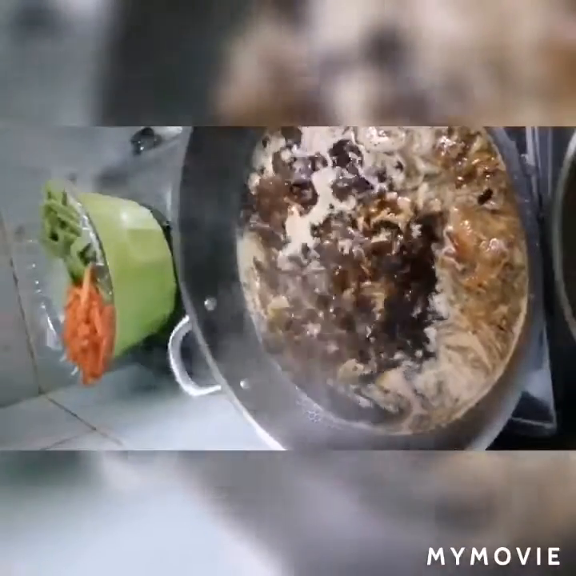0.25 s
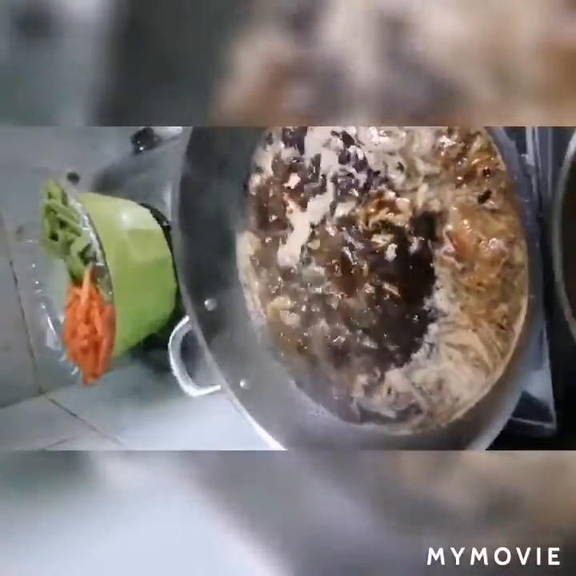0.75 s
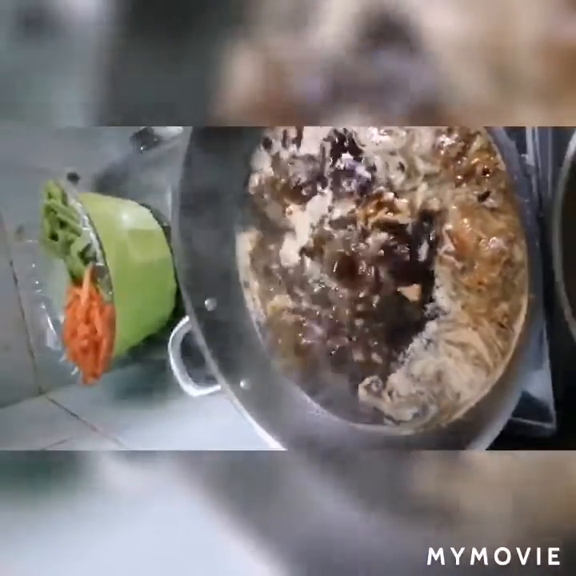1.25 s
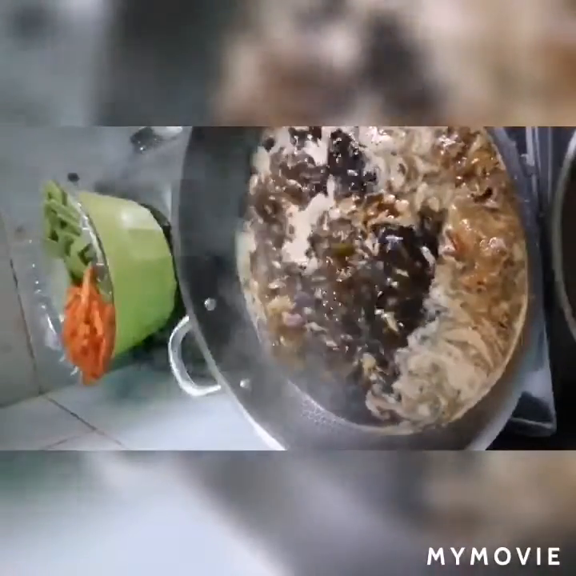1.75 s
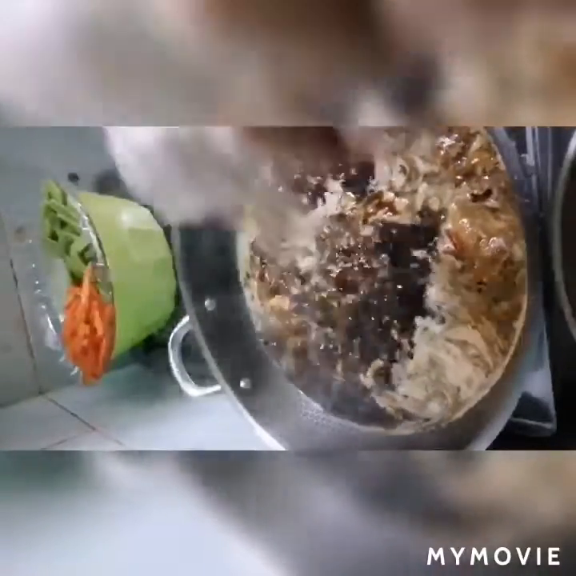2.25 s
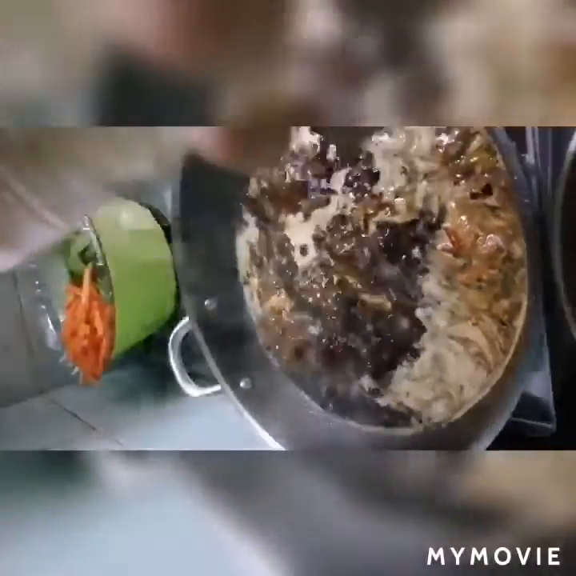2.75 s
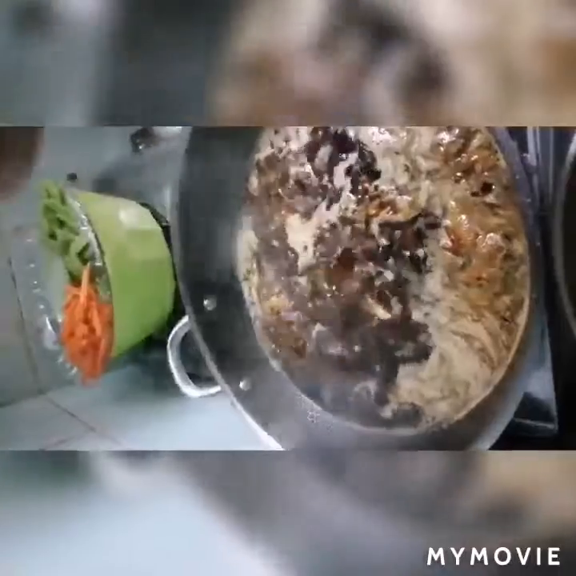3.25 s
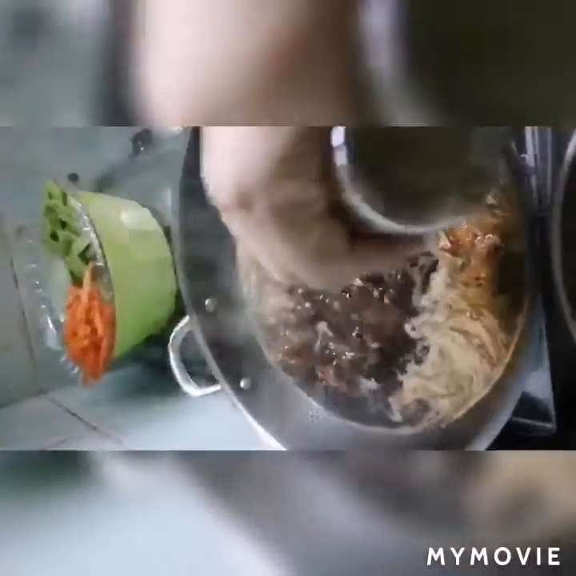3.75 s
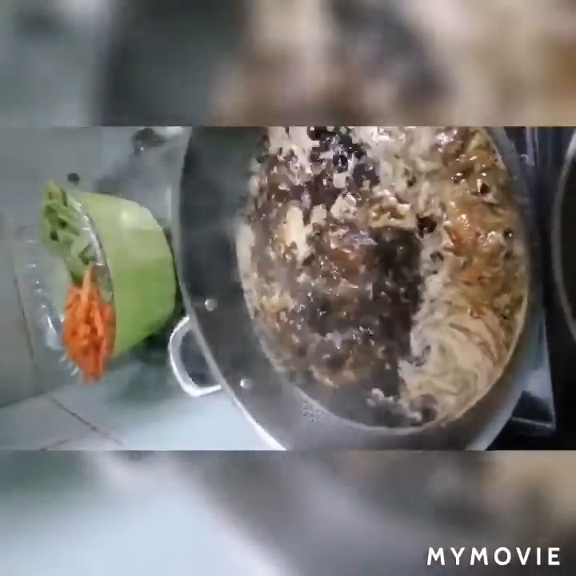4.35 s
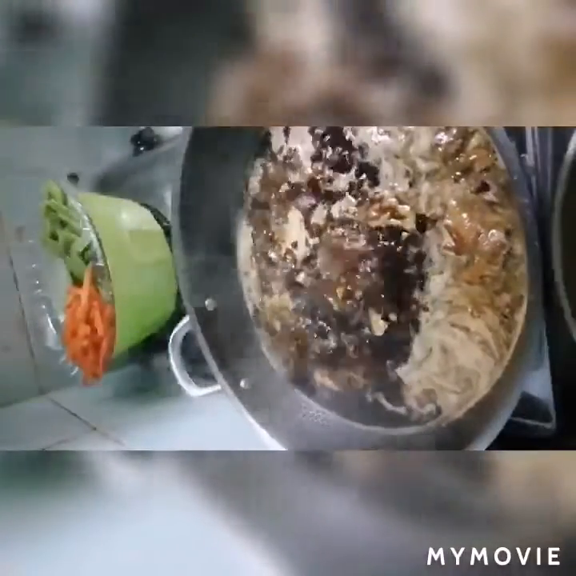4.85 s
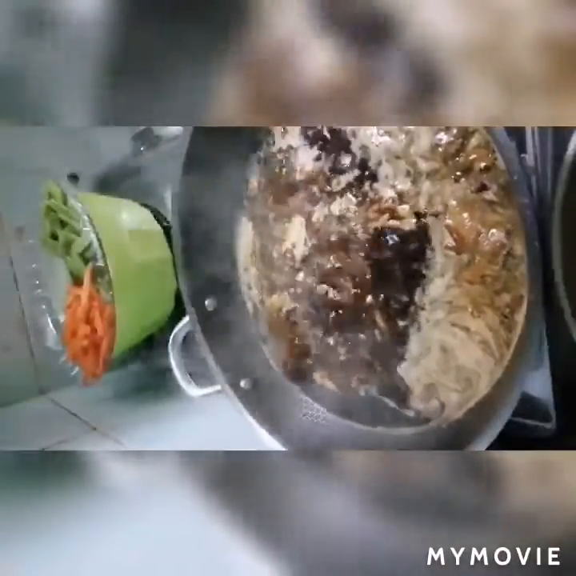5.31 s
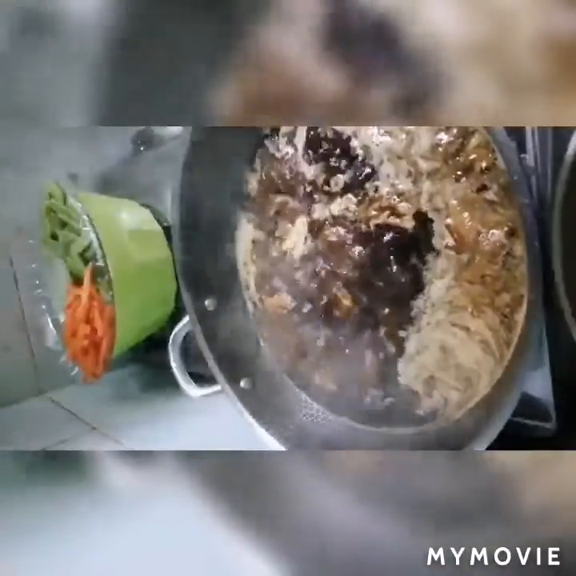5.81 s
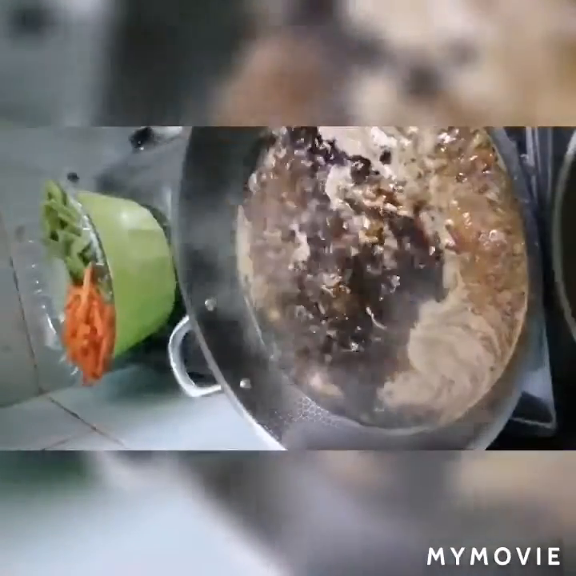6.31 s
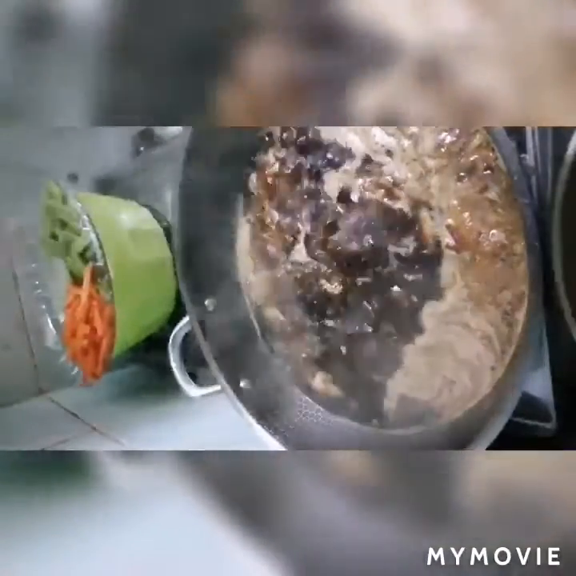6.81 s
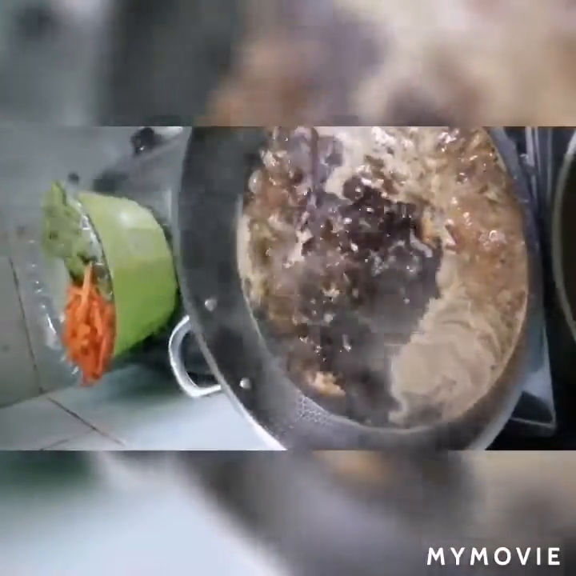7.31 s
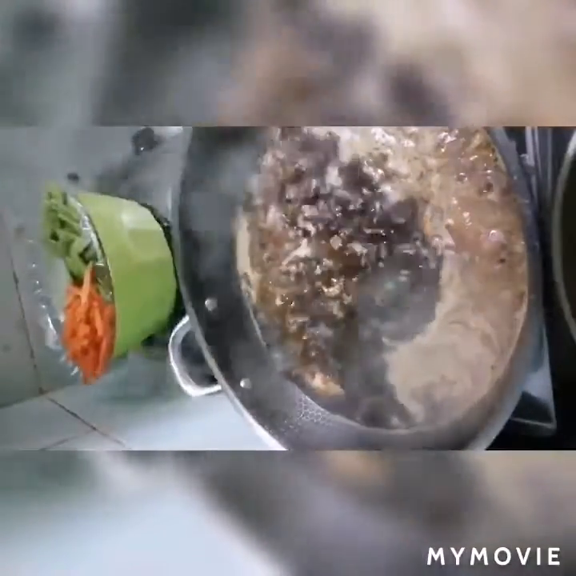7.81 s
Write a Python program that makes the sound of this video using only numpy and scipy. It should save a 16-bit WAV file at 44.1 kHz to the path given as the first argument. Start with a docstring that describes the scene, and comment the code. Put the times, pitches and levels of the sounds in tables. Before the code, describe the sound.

Noodles simmer softly with blips and faint hiss while a crinkly packet rattles sharply, goes quiet, clinks past, then is shaken again.

```python
"""Noodles simmer in a wok in a small kitchen: faint sizzle, soft bubbles, wavering hum and rumble throughout.
0-0.6 s: a crisp packet is shaken and crinkled close by (bursts of filtered clicks), some shakes with a low, dull part.
0.9-5.1 s: small rustles; thin whistles of narrow-band noise; from 4.6 s a clink of ringing modes, then fainter ones.
5.7-7.2 s: a second bout of shaking. Packet treble peaks near 6 and 10 kHz; gain control ducks all under loud shakes."""
import sys
import numpy as np
from scipy import signal
from scipy.fft import rfft, irfft, next_fast_len
from scipy.io import wavfile
from scipy.ndimage import uniform_filter1d

SR = 44100
rng = np.random.default_rng(int(sys.argv[2]) if len(sys.argv) > 2 else 0)


def dump_mix(stems):
    """Bounce the given channels to the path in sys.argv[1] as a 16-bit WAV at rate SR."""
    frames = np.atleast_2d(stems).T  # one column per channel
    limited = np.clip(frames, -1, 1)  # hard clip at full scale
    pcm = np.round(limited * 32767).astype(np.int16)
    wavfile.write(sys.argv[1], SR, pcm)


N = 355931

# Levels are before ducking.
# Crackle bursts: packet shakes and rustles; the rows at 4.807 and 5.024 are the noisy touch of the fainter clinks.
# Each row: start in seconds, level in dB before the overall trim, hollow air body in dB re film,
# crisp top in dB re film, shower T60 in seconds, snap in dB re shower.
CRACKLE_BURSTS = [(0.0024, -42, -7.5, -11, 0.19, 9), (0.026, -49, -22, -14, 0.13, 10),
                  (0.0726, -29.5, -19, -5, 0.29, -2), (0.0852, -30.5, -19, -8, 0.3, -5),
                  (0.1204, -32, -5, -8, 0.22, -5), (0.136, -24, -23, 0, 0.12, -5),
                  (0.1644, -27, -13.5, -5, 0.17, 3), (0.2487, -28.5, -19.5, -9, 0.18, -8),
                  (0.294, -37, -16, -10, 0.22, -7), (0.4194, -28, -13.5, -10, 0.11, -16),
                  (0.4414, -26, -19, -7.5, 0.12, -4), (0.464, -39.5, -3, 0.5, 0.18, -6),
                  (0.486, -28.5, -16, -4, 0.17, 4.5), (0.5923, -46, -5.5, -6, 0.14, 6),
                  (0.891, -63, -19, 10, 0.36, -8), (2.102, -63, -23, 8.5, 0.16, 3),
                  (2.458, -50, -6.5, 2, 0.12, -14), (3.257, -54, -6.5, -6, 0.13, -1),
                  (3.749, -64, -23, 17.5, 0.072, 3), (3.831, -46.5, -22, 0, 0.21, -15),
                  (3.8538, -51, -19, -1, 0.13, -3), (4.055, -53.5, -30, 5, 0.12, -10),
                  (4.105, -55, -32, 0, 0.12, -1), (4.807, -50.5, -14, -4, 0.11, -5),
                  (5.024, -55.5, -24, 0.5, 0.098, 5), (5.706, -49, -4, -8, 0.16, -14),
                  (5.727, -42, -15, -17, 0.27, -15), (5.7566, -28, -46, -16, 0.076, -3),
                  (5.7715, -33.5, -46, -13, 0.2, -10), (5.884, -42.5, -10.5, -17, 0.53, -1),
                  (5.916, -41.5, -5, -13, 0.23, -4), (5.958, -39, -35, -22, 0.13, 9),
                  (6.035, -32.5, -18, -36, 0.092, -14), (6.06, -32, -16, -22, 0.22, -10),
                  (6.078, -25.5, -18, -16, 0.15, -3), (6.106, -36.5, -4.5, -8, 0.14, -5),
                  (6.132, -31.5, -36, -16, 0.14, 5), (6.183, -33.5, -34, -14, 0.2, -3),
                  (6.206, -40, -4, -16, 0.16, -9), (6.2212, -36, 5, -10, 0.046, 9),
                  (6.233, -29.5, -19, -13.5, 0.21, 6), (6.3358, -29, -27, -8, 0.34, -7),
                  (6.3612, -26, -16, -20, 0.14, -6), (6.387, -30.5, -14, -9, 0.21, -11),
                  (6.487, -36.5, -18, -1.5, 0.26, 5.5), (6.52, -38.5, -7, -12, 0.22, -11),
                  (6.549, -38.5, -12.5, -10, 0.14, -10), (6.571, -38.5, -25, -15, 0.13, -3),
                  (6.6478, -30, -19, -10, 0.27, -8), (6.6577, -22, -16.5, -6.5, 0.26, -1),
                  (6.7074, -28, -17.5, -9, 0.2, 0), (6.7444, -36.5, -37.5, -7, 0.18, -5),
                  (6.8077, -39.5, -18, -15, 0.37, -4), (6.8307, -50, 9.5, -7, 0.32, 4),
                  (6.852, -34, -22, -12, 0.15, -10), (6.883, -42, -15, -11, 0.092, -3),
                  (6.941, -25.5, -20, -3, 0.26, 3), (6.976, -26, -19, -8, 0.16, -10),
                  (7.001, -33, -12.5, -25, 0.21, 1), (7.1243, -50, -13, 2, 0.18, -9),
                  (7.1403, -36.5, -10.5, -24.5, 0.12, -18), (7.172, -43, -7, -12, 0.044, -11)]
# Crackle spectrum, before its bands are levelled apart. Each row: frequency in Hz, relative density in dB per Hz.
CRACKLE_SPECTRUM = [(530, -54), (900, -40), (1400, -34.5), (1920, -21.5), (2120, -18.5), (2360, -19),
                    (2790, -28), (3960, -37), (5280, -4.5), (6250, 1.5), (7680, -9), (9880, 5.5),
                    (12000, -6), (15100, -11), (16000, -21)]
# Low, dull part of some first-bout shakes. Each row: start in seconds, nominal level in dB.
LOW_THUDS = [(0.04, -66), (0.136, -47), (0.167, -45), (0.384, -55), (0.46, -50.5), (0.488, -52)]
# Something hard set down. Each row: start in seconds, nominal level in dB.
CLINK_EVENTS = [(4.6506, -34), (4.806, -49.5), (5.027, -54)]
# Modes of the clinking object. Each row: frequency in Hz, relative level in dB, T60 in seconds.
CLINK_MODES = [(2046, -11, 0.2), (2380, -2.5, 0.15), (2900, -2, 0.18), (3080, -4, 0.1), (3120, -7, 0.25),
               (3240, -1, 0.043), (4930, -1, 0.12), (5370, -23, 0.38), (5770, -6, 0.15), (6029, -23, 0.27),
               (8700, -28, 0.89)]
# Bubbles that stand out. Each row: start in seconds, nominal peak in dB, starting pitch in Hz,
# cycles (of that pitch) to fall 30 dB, splat start level in dB.
LOUD_BUBBLES = [(0.628, -47, 500, 6.0, -68), (0.703, -49, 500, 9, -64), (0.796, -57, 296, 13, -61),
                (0.844, -45.5, 553, 7, -71), (1.14, -55, 627, 6.0, -59), (1.202, -44, 553, 6, -69),
                (1.453, -50, 494, 10, -57.5), (1.577, -53, 666, 3, -57.5), (1.689, -47, 290, 5, -49.5),
                (1.892, -52, 645, 9, -60), (2.004, -55, 615, 9, -63), (2.348, -54, 466, 13, -75),
                (2.447, -53, 603, 14, -68), (2.518, -40.5, 580, 9.5, -62), (2.572, -47, 610, 7.1, -77),
                (2.687, -59, 662, 6.0, -58.5), (2.735, -52, 607, 6.6, -74), (2.796, -54, 640, 13, -73),
                (2.955, -49.5, 613, 16.0, -69), (3.062, -55, 477, 17, -61), (3.227, -48, 495, 4, -59),
                (3.42, -50.5, 460, 20, -66), (3.809, -45.5, 530, 6, -79), (3.852, -50, 600, 8, -72),
                (4.037, -52, 576, 9, -62), (4.163, -41.5, 606, 8, -59), (4.283, -52, 630, 7.2, -75),
                (4.988, -54, 563, 6.0, -63), (5.025, -42.5, 248, 5.0, -66), (5.136, -52, 606, 9.0, -66),
                (5.22, -49, 650, 5, -60), (5.426, -58, 616, 6.0, -75), (5.635, -45, 510, 4.5, -63),
                (6.12, -47, 285, 6.0, -70), (6.223, -52, 659, 11, -71), (7.449, -48.5, 580, 9, -70),
                (7.639, -51, 614, 6, -66), (7.787, -52, 536, 8, -70)]
# Sizzle colour. Each row: frequency in Hz, relative density in dB per Hz.
SIZZLE_SPECTRUM = [(530, -17), (900, -4.5), (1040, -7), (1320, -9), (1620, -11), (2890, -10), (3820, -18.5),
                   (4570, -14.5), (5820, -2), (7770, -18.5), (8760, -14), (10000, -3), (12600, -17.5),
                   (15100, -12.5), (16000, -63)]
# Faint thin whistles. Each row: start in seconds, end in seconds, frequency in Hz,
# width of each resonance in Hz, level at full swell in dB.
FAINT_WHISTLES = [(3.25, 3.322, 4500, 350, -66.5), (4.38, 4.643, 4770, 120, -73),
                  (4.81, 4.835, 2840, 150, -62), (5.022, 5.044, 3860, 150, -63.5)]
# Hum tones. Each row: frequency in Hz, pitch waver in Hz, relative level in dB.
HUM_TONES = [(31.8, 1.46, 2.5), (69, 5.54, -12), (99, 3.56, -21.5), (131.5, 3.7, -1.5), (155.3, 0.56, 5.5),
             (196.3, 3.13, -3), (326.4, 1.14, -4.5), (488.6, 8.2, -9)]
# Rumble colour. Each row: frequency in Hz, relative density in dB per Hz.
RUMBLE_SPECTRUM = [(18, -14), (27, -15.5), (48, 1.5), (56, -9), (120, -1.5), (250, -10), (330, -9),
                   (430, -24), (600, -12.5), (1200, -38.5), (2500, -71)]

GRAINS_PER_S = 7000
SHAKE_TRIM_DB = 9   # overall lowering of all crackle bursts
RISE_S, HOLD_S, SNAP_T60_S = .003, .012, .018
BODY_LAG_S = .004   # the air inside answers late
AIR_LOW_HZ, AIR_HZ, BODY_WIDTH_HZ, BODY_RING = 1976, 2333, 170, 1.2   # ring: share re plain band
FILM_LOW_HZ, FILM_HZ, FILM_WIDTH_HZ, FILM_RING = 5290, 6370, 550, .8
FILM_LOW_SHARE = 1   # most that the lower film ridge gets of the ring
RASP_DB, SCRATCH_DB = -25, -18.5   # re film, for a -30 dB shake
FAINT_RASPIER = 0.2   # dB of rasp and scratch gained per dB that a shake is below -30 dB
THUD_LOW_HZ, THUD_HIGH_HZ, THUD_T60_S = 552, 1040, 0.098
RATTLE_DB, CLINK_RING_DB, RATTLE_T60_S = -10, -15, 0.17   # dB re clink level
BUBBLING_DB, SPLAT_T60_S = -72, 0.087
SIZZLE_DB = -63
HUM_DB, RUMBLE_RE_HUM_DB = -60.5, -2
KITCHEN_T60_S, KITCHEN_DB = 0.18, -12
DUCK_FROM_DB, DUCK_SHARE, RELEASE_DB_PER_S = -42, 0.31, 9
CUTOFF_HZ = 15850


def from_db(db):
    """Gain of a level in dB."""
    return 10 ** (np.asarray(db) / 20)


def rms_one(x):
    """Scaled to rms 1."""
    return x / np.sqrt(np.mean(x ** 2) + 1e-20)


def colour(x, spectrum):
    """Shapes x by a spectrum drawn on a log-frequency axis; rms 1."""
    hz, db = np.transpose(spectrum)
    size = next_fast_len(N)
    log_hz = np.log(np.arange(size // 2 + 1) * SR / size + 1)
    gain = from_db(np.interp(log_hz, np.log(hz), db))
    return rms_one(irfft(rfft(x, size) * gain, size)[:N])


def band(x, low_hz, high_hz):
    """Steep band-pass; rms 1."""
    sos = signal.butter(4, [low_hz, high_hz], "band", fs=SR, output="sos")
    return rms_one(signal.sosfilt(sos, x))


def drift(rate_hz):
    """Slow chance: random knots at rate_hz, joined by lines."""
    knots = rng.standard_normal(4000)
    return np.interp(np.arange(N) * rate_hz / SR, np.arange(4000), knots)


def grains(per_s, spread_db):
    """Random clicks of uneven size and sign."""
    sizes = from_db(spread_db * np.minimum(rng.exponential(1, N), 4))
    sizes *= rng.choice([-1, 1], N)
    return sizes * (rng.random(N) < per_s / SR) + 1e-18


def resonate(x, hz, width_hz):
    """One resonance with gain near 1 on top."""
    r = np.exp(-np.pi * width_hz / SR)
    poles = [1, -2 * r * np.cos(2 * np.pi * hz / SR), r * r]
    return signal.lfilter([(1 - r * r) / 2, 0, (r * r - 1) / 2], poles, x)


def ring(clicks, hz, t60_s):
    """A unit click sets a decaying sine of initial height 1 ringing."""
    r, w = from_db(-60 / (t60_s * SR)), 2 * np.pi * hz / SR
    return signal.lfilter([0, np.sin(w)], [1, -2 * r * np.cos(w), r * r], clicks + 1e-18)


def packet():
    """Each burst is a snap of the film and a shower of tiny crackles that holds, then dies away."""
    out, t = np.zeros(N), np.arange(SR // 2) / SR
    clumps = from_db(1.04 * drift(300))
    crackle = colour(grains(GRAINS_PER_S, spread_db=3.0) * clumps, CRACKLE_SPECTRUM)
    edges_hz = [500, 1500, 2800, 4300, 8000, 17000]
    low, body, scratch, film, top = [band(crackle, *pair) for pair in zip(edges_hz, edges_hz[1:])]
    film_lower, film_upper = [rms_one(resonate(film, hz, FILM_WIDTH_HZ)) for hz in (FILM_LOW_HZ, FILM_HZ)]
    air_lower, air_upper = [rms_one(resonate(body, hz, BODY_WIDTH_HZ)) for hz in (AIR_LOW_HZ, AIR_HZ)]
    chance = rng.random((len(CRACKLE_BURSTS), 3))
    after_rise = np.maximum(t - RISE_S, 0)
    air_onset = 1 - np.exp(-t / BODY_LAG_S)
    for (place, air_mix, film_mix), burst in zip(chance, CRACKLE_BURSTS):
        s, level_db, body_db, top_db, t60_s, snap_db = burst
        start = int(place * (N - len(t)))   # random stretch of crackle
        part = slice(start, start + len(t))
        shower = from_db(-60 * np.maximum(after_rise - HOLD_S, 0) / max(t60_s, .01))
        snap = from_db(snap_db - 60 * after_rise / SNAP_T60_S)
        envelope = (shower + snap) * from_db(level_db - SHAKE_TRIM_DB) * np.minimum(t / RISE_S, 1) ** 4
        # chance mixes two air ridges and two film ridges anew in each burst
        share = FILM_LOW_SHARE * film_mix
        hollow = air_mix * air_lower[part] + (1 - air_mix) * air_upper[part]
        ridges = share * film_lower[part] + (1 - share) * film_upper[part]
        air = rms_one(body[part] + BODY_RING * rms_one(hollow))
        skin = rms_one(film[part] + FILM_RING * rms_one(ridges))
        raspy_db = FAINT_RASPIER * (-30 - level_db)
        rasp = from_db(RASP_DB + raspy_db) * low[part]
        inside = (from_db(body_db) * air + rasp) * air_onset
        edge = from_db(SCRATCH_DB + raspy_db) * scratch[part] + from_db(top_db) * top[part]
        at = round(s * SR)
        out[at:at + len(t)] += (envelope * (inside + skin + edge))[:N - at]
    return out


def low_thuds():
    """Low, dull part of some shakes: band-passed grains that die fast."""
    out, t = np.zeros(N), np.arange(SR // 4) / SR
    thud = band(grains(3000, spread_db=2.0), THUD_LOW_HZ, THUD_HIGH_HZ)
    onset = 1 - np.exp(-t / BODY_LAG_S)
    for s, db in LOW_THUDS:
        at = round(s * SR)
        out[at:at + len(t)] += from_db(db - 60 * t / THUD_T60_S) * onset * thud[at:at + len(t)]
    return out


def clinks():
    """A hard touch rings its modes and leaves a short rattle that dies."""
    out, t = np.zeros(N), np.arange(SR // 4) / SR
    rattle = band(rng.standard_normal(N), 2030, 6100)
    clicks = np.zeros(N)
    for s, level_db in CLINK_EVENTS:
        at = round(s * SR)
        clicks[at] = from_db(level_db)
        decay = from_db(level_db + RATTLE_DB - 60 * t / RATTLE_T60_S)
        out[at:at + len(t)] += decay * rattle[at:at + len(t)]
    return out + sum(from_db(db + CLINK_RING_DB) * ring(clicks, hz, t60_s) for hz, db, t60_s in CLINK_MODES)


def bubbles(bubbling_db):
    """Many small bubbles ring a few cycles at random pitches; standout ones rise in pitch, with a splat."""
    born = grains(300 * from_db(4.4 * drift(7.6)), spread_db=5.0)
    pitch_index = rng.integers(0, 16, N)
    small = sum(ring(born * (pitch_index == k), hz, 6.3 / hz)
                for k, hz in enumerate(np.geomspace(420, 1500, 16)))
    softened = signal.lfilter([.01], [1, -2 * .88, .88 ** 2], small)   # low-pass
    out = from_db(bubbling_db) * rms_one(softened)
    t = np.arange(SR // 12) / SR
    splat = band(rng.standard_normal(N + SR), 220, 1280)
    for s, peak_db, hz, cycles, splat_db in LOUD_BUBBLES:
        at = round(s * SR)
        swell = (1 - np.exp(-t * hz * 1.8)) * from_db(peak_db - 30 * t * hz / cycles)
        tone = np.sin(2 * np.pi * hz * t * (1 + 3.6 * t))
        burst = from_db(splat_db - 60 * t / SPLAT_T60_S) * splat[at:at + len(t)]
        out[at:at + len(t)] += (swell * tone + burst)[:N - at]
    return out


def sizzle():
    """Fine spray at the hot rim: hiss that flickers band by band, with sparse crackles on it."""
    edges_hz = np.geomspace(400, 18000, 12)
    white = rng.standard_normal((2, N))
    together = drift(12)
    hiss = np.zeros(N)
    for k, (low, high) in enumerate(zip(edges_hz, edges_hz[1:])):
        flicker = from_db(1.2 * together + 1.5 * drift(25))
        hiss += np.sqrt(high - low) * band(white[k % 2], low, high) * flicker
    crackles = rms_one(grains(600, spread_db=4.0))
    return colour(rms_one(hiss) + .3 * crackles, SIZZLE_SPECTRUM)


def whistles():
    """Air noise through a doubled narrow resonance, swelling and fading."""
    out, t = np.zeros(N), np.arange(N) / SR
    white = rng.standard_normal(N)
    for start_s, end_s, hz, width_hz, db in FAINT_WHISTLES:
        tone = rms_one(resonate(resonate(white, hz, width_hz), hz, width_hz))
        progress = np.clip((t - start_s) / (end_s - start_s), 0, 1)
        out += from_db(db) * tone * np.sqrt(np.sin(np.pi * progress) + 1e-12)
    return out


def hum():
    """Tones of the stove and appliances that waver in pitch and level, over a broad rumble."""
    tones = np.zeros(N)
    for hz, waver_hz, db in HUM_TONES:
        level = from_db(db + 2.6 * drift(6.4))
        phase = 2 * np.pi * np.cumsum(hz + waver_hz * drift(12)) / SR
        tones += level * np.sin(phase)
    rumble = colour(rng.standard_normal(N), RUMBLE_SPECTRUM)
    return rms_one(tones) + from_db(RUMBLE_RE_HUM_DB) * rumble


def kitchen(x):
    """Echoes of hard walls: a dense noise tail that dies evenly."""
    t = np.arange(SR // 3) / SR
    tail = rng.standard_normal(len(t)) * from_db(-60 * t / KITCHEN_T60_S) * (t > .004)
    return signal.fftconvolve(x, tail / np.sqrt(np.sum(tail ** 2)))[:N]


def scene():
    """Packet, low thuds and clinks with their room, over the simmering wok, whistles and hum."""
    near = packet() + low_thuds() + clinks()
    wok = bubbles(BUBBLING_DB) + from_db(SIZZLE_DB) * sizzle() + whistles()
    room = from_db(KITCHEN_DB) * kitchen(near)
    return (near + room + wok + from_db(HUM_DB) * hum())[None]


def record(dry):
    """Gain control turns down a share of whatever exceeds a level and recovers slowly; the top is cut."""
    level_db = 10 * np.log10(uniform_filter1d(dry[0] ** 2, SR // 50) + 1e-12)
    excess_db = DUCK_SHARE * np.maximum(level_db - DUCK_FROM_DB, 0)
    slope_db = RELEASE_DB_PER_S * np.arange(N) / SR
    held_db = np.maximum.accumulate(excess_db + slope_db) - slope_db   # linear release in dB
    duck_db = uniform_filter1d(held_db, SR // 50)
    low_pass = signal.ellip(10, .5, 60, CUTOFF_HZ, fs=SR, output="sos")
    return signal.sosfilt(low_pass, dry * from_db(-duck_db))


dry = scene()
out = record(dry)
dump_mix(out)
```